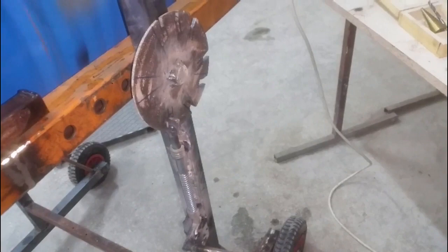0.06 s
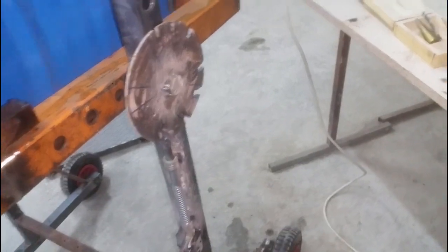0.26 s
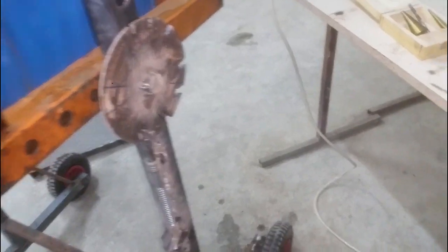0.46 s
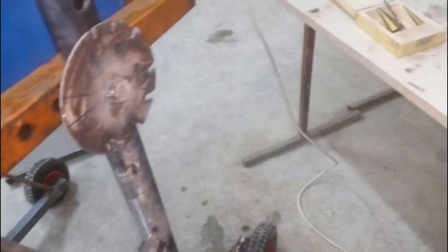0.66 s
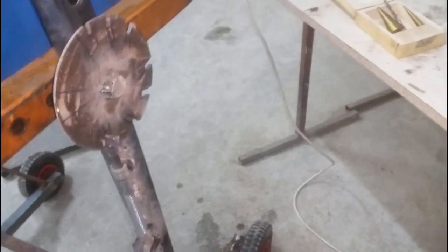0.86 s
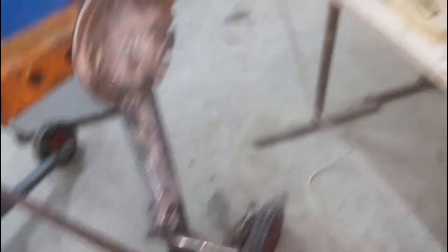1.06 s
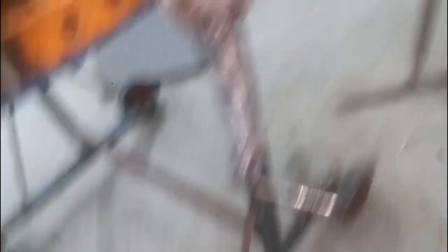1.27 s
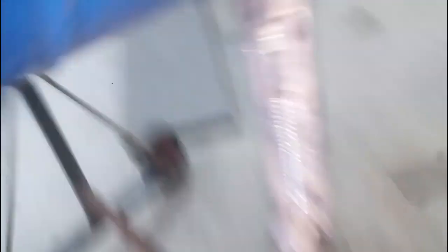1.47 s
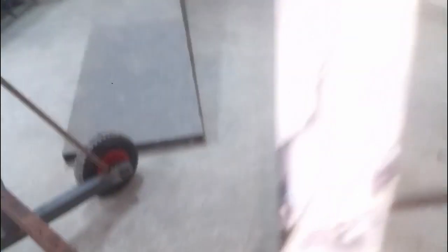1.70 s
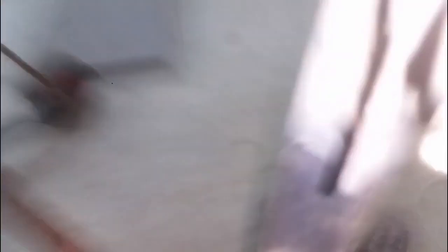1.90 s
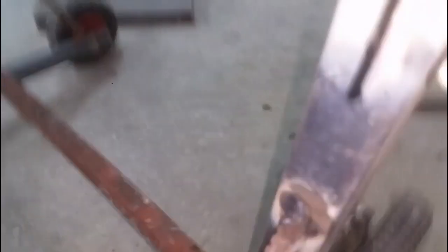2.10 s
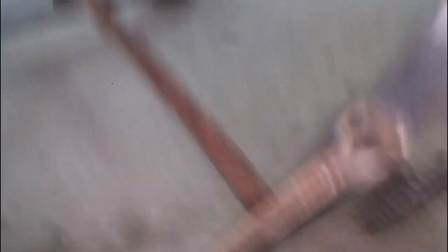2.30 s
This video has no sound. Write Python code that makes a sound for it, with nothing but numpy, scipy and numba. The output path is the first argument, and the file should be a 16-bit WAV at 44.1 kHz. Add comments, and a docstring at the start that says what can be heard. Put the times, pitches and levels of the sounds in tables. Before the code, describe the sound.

A steel trolley rolls over a concrete workshop floor, its frame rumbling and rattling as grit hisses and loose metal clinks. Near the end a sharp knock and brief finger rub hit the close microphone, and the rolling quietens.

```python
"""Trolley on a workshop floor

A steel trolley is pushed over concrete, close to a hand-held phone with two microphone ports.
Its knobbly wheels drum the frame into a rumble, grit hisses under them and loose metal parts clink.
A knock overloads the phone, a finger judders over it and the limiter ducks; the trolley rolls on slowly.
"""
import sys
import numpy as np
from scipy import signal
from scipy.fft import rfft, irfft
from scipy.io import wavfile
from scipy.ndimage import uniform_filter1d, minimum_filter1d
from numba import njit

SR = 44100
rng = np.random.default_rng(int(sys.argv[2]) if len(sys.argv) > 2 else 0)


def wrap_up_sound(samples):
    """Save the sound to the file named by the first command line argument, as 16-bit audio."""
    columns = np.atleast_2d(samples).T
    # keep every value between -1 and 1, then stretch to whole-number steps
    tamed = np.clip(columns, -1, 1)
    steps = np.round(tamed * 32767).astype(np.int16)
    wavfile.write(sys.argv[1], SR, steps)


N = 108045
T, F = np.arange(N) / SR, np.maximum(np.fft.rfftfreq(2 * N, 1 / SR), 1)
START_S, PORT_LAG_S = .132, .00042


# The trolley passing close by. Each row: time in seconds, level in dB, bass and rattle offsets in dB.
ROLLING = [(.135, -53.5, 3, -5), (.16, -34, -5.5, -11), (.2, -31, -2.5, -10), (.33, -26.5, -0.5, -11),
           (.455, -25, -1.5, -7), (.49, -21.5, -2, -8.5), (.57, -21, 0.5, -8), (.68, -22.5, 3, -6.5),
           (.84, -17.5, -4.5, -10.5), (.92, -18, 0.5, -6.5), (1.06, -17.5, 0, -10), (1.19, -17.5, 3, -9.5),
           (1.28, -17, -1, -9), (1.4, -19, 2, -7.5), (1.62, -21.5, 0.5, -9), (1.9, -24, -3.5, -10),
           (2.02, -23, 6.5, -11), (2.2, -32, -4.5, -7), (2.45, -34.5, 2.5, -11.5)]

def trolley(jolt_db=1, jolts_per_s=22):
    """The wheels drum the frame and shake its joints in uneven jolts."""
    drive = undb(curve(ROLLING) + jolt_db * walk(jolts_per_s)) * (T > START_S)
    return drive * (rumble(curve(ROLLING, column=2)) + rattle(curve(ROLLING, column=3)))


# Modes of the steel frame. Each row: pitch in Hz, width in Hz, relative level in dB.
FRAME_MODES = [(48, 5, -11), (73, 6, 1), (99, 8, -3), (114, 7, -1), (150, 16, -12), (171, 12, -8),
               (199, 9, -6), (219, 12, 0), (247, 14, -5), (318, 11, -2), (341, 16, -5), (363, 12, -11),
               (434, 8, -7), (460, 14, -11), (496, 10, -14), (525, 8, -4), (600, 8, -10), (640, 18, -11),
               (742, 10, -17), (899, 12, -20), (938, 10, -18), (1136, 10, -22)]
# Frame and floor between the modes. Each row: frequency in Hz, relative level in dB.
BROAD_RESPONSE = [(20, -26), (45, -26), (65, -18), (110, -39), (210, -2), (280, 10.5), (350, 8), (400, 6.5),
                  (560, 6.5), (720, -24), (860, -9), (1100, -49), (1600, -55), (4000, -71)]
# The rumble sits left of the phone. Each row: frequency in Hz, left minus right in dB.
RUMBLE_BALANCE = [(70, 1.4), (150, 1.6), (250, 0.34), (450, 4.9), (750, 6.8), (1200, 8)]

def rumble(bass_db, tyre_hz=1083, bass_edge_hz=222):
    """Tread impacts, softened by the tyres, ring the frame."""
    tread = lambda: ports(bumps(980, spread_db=-1.5))
    modes = modal_response(FRAME_MODES) / (1 + (F / tyre_hz) ** 6)
    ring = unit(through(tread(), modes))
    broad = unit(through(tread(), undb(over_hz(BROAD_RESPONSE))))
    frame = through(ring + undb(-9) * broad, pan(over_hz(RUMBLE_BALANCE)))
    bass = through(frame, 1 / (1 + (F / bass_edge_hz) ** 8))
    return undb(-.5) * unit(frame - bass) + undb(bass_db) * unit(bass)


# Bearings and joints at close range. Each row: frequency in Hz, relative level in dB.
RATTLE_COLOUR = [(300, 3.5), (700, -2.5), (1000, 6), (1300, 6), (1700, 3), (2250, -0.5), (2800, -7),
                 (3500, -12), (4600, -16), (5200, -22), (7500, -26.5), (12000, -30), (15500, -17)]

def rattle(level_db):
    """Bearings and joints chatter through the many close, high modes of the steel tubes."""
    impacts = ports(bumps(7000, spread_db=1.3))
    ring = rng.standard_normal((2, N)) * fade(0, t60=.068)
    tubes = 1 + 1.65 * unit(np.abs(rfft(ring, 2 * N)))
    chatter = unit(through(impacts, undb(over_hz(RATTLE_COLOUR)) * tubes))
    return undb(level_db - 1) * chatter * pan(2)


# Dents in the concrete. Each row: start in seconds, relative level in dB, pitch in Hz.
FLOOR_DENTS = [(0.467, -5.5, 322.6), (0.47, -17, 375), (0.841, -8, 237)]

def dents(rise_s=.042, t60=.14):
    """A wheel drops into a dent and rings a single mode."""
    out = 0
    for start, db, hz in FLOOR_DENTS:
        envelope = fade(start, t60) - fade(start, rise_s)
        out = out + undb(db) * envelope * np.sin(2 * np.pi * hz * (T - start))
    return out * pan(2)


# Drones of the frame, just left of centre. Each row: middle and length in seconds, pitch in Hz,
# glide in Hz per second, level in dB.
FRAME_DRONES = [(0.298, 0.2, 218.6, 0, -31), (0.668, 0.59, 330, -5, -24), (.8, 0.22, 218.3, 47, -19.5),
                (1.02, 0.51, 529, 5, -22.5), (1.06, 0.22, 216.3, -30, -20.5),
                (1.251, 0.37, 73.3, -2, -21.5), (.95, 0.15, 109.7, -5, -19), (1.32, 0.21, 111.9, 28, -15.5),
                (1.325, 0.32, 317.8, -7, -22.5), (1.879, 0.21, 318.7, 5, -22.5), (1.428, 0.17, 600, 9, -22),
                (1.5, 0.099, 639, 0, -22.5), (1.621, 0.11, 223.5, -4, -21.5), (1.8, 0.18, 207.2, -130, -20),
                (2.21, 0.27, 333.8, -130, -30.5), (2.41, 0.15, 205, 0, -29)]

def drones(waver_db=-.5, wavers_per_s=23):
    """The rolling catches single modes of the frame, which swell, waver and die away."""
    out, port_delay = 0, np.array([[0], [PORT_LAG_S]])
    for middle, length, hz, glide, db in FRAME_DRONES:
        t = T - middle
        swell = np.cos(np.pi * np.clip(t / length, -.5, .5))
        level = undb(db + waver_db * walk(wavers_per_s))
        turns = hz * (t - port_delay) + glide * t ** 2 / 2 + rng.random()
        out = out + swell * level * np.sin(2 * np.pi * turns)
    return out * pan(1.5)


# The phone rattling to and fro in the grip. Each row: start in seconds, relative level in dB,
# direction as +1 or -1, T60 in seconds, brightness of the contact in Hz.
GRIP_KNOCKS = [(1.9662, 15, 1, .009, 3200), (1.9674, 22, -1, .011, 3200), (1.9712, 15, 1, .015, 1500),
               (1.9768, 12, -1, .013, 1100), (1.9808, 16, 1, .014, 900), (1.9895, 8, 1, .012, 350),
               (2.0005, 13, 1, .018, 300)]
# Modes of the phone body. Each row: pitch in Hz, width in Hz, relative level in dB.
PHONE_MODES = [(206, 26, -7), (387, 93, 5.5), (695, 180, 7)]

def knocks():
    """Pushes, hard then softer, hit the right port directly and both ports through the ringing body."""
    push = 0
    for start, db, direction, t60, hz in GRIP_KNOCKS:
        contact = 1 / (1 + 1j * F / hz) ** 2
        push = push + through(undb(db - .5) * direction * fade(start, t60), contact)
    body = through(push, modal_response(PHONE_MODES))
    return np.array([-undb(-4) * body, push + undb(-6.5) * body])


def finger_judder(start=2.023, end=2.105, slips_per_s=47, case_hz=141):
    """A finger slips in jerks by the right port, and each slip thumps the case."""
    slips = np.arange(start, end, 1 / slips_per_s)
    lift = np.clip((end + .011 - T) / .02, 0, 1)
    out = 0
    for due, (late, size_db, tightness) in zip(slips, rng.standard_normal((len(slips), 3))):
        onset = due + .00098 * late
        hz = case_hz * (1 + .095 * tightness)
        thump = fade(onset, t60=.054) * np.sin(2 * np.pi * hz * (T - onset))
        out = out + undb(13.5 + size_db) * through(thump, resonance(case_hz, width=196))
    return out * lift * undb([[-48], [0]])


# Loose metal, near and to the left. Each row: start in seconds, level in dB, left minus right in dB.
METAL_CLINKS = [(.3196, -49, 16), (0.8787, -45.5, 17), (.973, -39, 12), (0.9936, -29.5, 8),
                (1.3112, -25, 11), (1.344, -46, 6), (1.3647, -35.5, 11), (2.116, -47, 16), (2.127, -51, 8),
                (2.156, -40.5, 13)]
# Modes of the loose part. Each row: pitch in Hz, width in Hz, relative level in dB.
METAL_MODES = [(4200, 110, 1), (4630, 250, 1), (6000, 520, -6.5), (7020, 120, -1.5), (8070, 80, -4),
               (9160, 230, -1), (9240, 200, -1), (10300, 240, 9.5), (11200, 580, 4.5), (12270, 100, 12),
               (12350, 130, 3.5), (13050, 200, -1), (14000, 560, -12)]

def clinks(t60=.15, room_t60=.46, room_db=-19):
    """A loose steel part chatters briefly, and the workshop carries its ring."""
    shake = 0
    for start, db, side_db in METAL_CLINKS:
        decay = fade(start, t60) + undb(room_db) * fade(start, room_t60)
        shake = shake + undb(db) * pan(side_db) * decay
    return shake * unit(through(bumps(5000, spread_db=2.9), modal_response(METAL_MODES)))


# Grit on the floor, left of the phone. Each row: time in seconds, relative level in dB.
GRIT_LEVEL = [(.135, -61.5), (.2, -50), (.28, -48.5), (.33, -44), (.62, -42), (.8, -39), (.97, -35.5),
              (1.12, -39), (1.27, -39.5), (1.38, -42.5), (1.52, -39), (1.65, -36), (1.92, -44),
              (2.06, -50.5), (2.18, -51), (2.28, -53), (2.45, -60)]
# Its hiss at the microphone. Each row: frequency in Hz, relative level in dB.
GRIT_COLOUR = [(2000, 0), (5500, -22), (7500, -16), (8700, -10), (10200, 2.5), (11400, -1), (12400, -1),
               (13300, -8), (15800, -5.5)]

def grit():
    """Fine dust crunches under the wheel on the left."""
    grains = unit(through(bumps(12000, spread_db=2.5), undb(over_hz(GRIT_COLOUR))))
    level = undb(curve(GRIT_LEVEL) - 4.5 + 1.3 * walk(per_s=42.96))
    return grains * level * pan(14) * (T > START_S)


# The hand, right at the microphone. Each row: start in seconds, level in dB.
GRIP_TICKS = [(1.242, -39), (1.4415, -28)]

def grip_ticks():
    """The grip makes small, bright ticks on the case."""
    noise = unit(through(rng.standard_normal((2, N)), resonance(15000, width=2800) ** 2))
    return noise * sum(undb(db) * fade(start, t60=.03) for start, db in GRIP_TICKS)


# The phone's two microphone ports. Each row: frequency in Hz, likeness from 0 to 1.
PORT_LIKENESS = [(60, .88), (280, .85), (600, .62), (1000, .4), (2000, .25), (5000, .05)]

def ports(paths):
    """Two paths mix so that the bass is alike at both ports; the right one hears it later."""
    likeness = over_hz(PORT_LIKENESS)
    mid = through(paths[0], np.sqrt((1 + likeness) / 2))
    side = through(paths[1], np.sqrt((1 - likeness) / 2))
    return np.array([mid + side, through(mid - side, np.exp(-2j * np.pi * F * PORT_LAG_S))])


def undb(db):
    """Decibels to gain."""
    return 10 ** (np.asarray(db) / 20)


def unit(x):
    """Scale to rms 1."""
    return x / np.sqrt(np.mean(x ** 2))


def curve(rows, column=1):
    """One column of a timed table, for every sample."""
    rows = np.array(rows)
    return np.interp(T, rows[:, 0], rows[:, column])


def over_hz(rows):
    """Points joined on a log-frequency axis."""
    hz, value = np.array(rows).T
    return np.interp(np.log(F), np.log(hz), value)


def through(x, response):
    """Filter by a frequency response."""
    return irfft(rfft(x, 2 * N) * response)[..., :N]


def resonance(hz, width):
    """Response of one mode, gain 1 at its centre."""
    return 1 / (1 + 1j * (F ** 2 - hz ** 2) / (F * width))


def modal_response(modes):
    """Summed response of an object's modes."""
    return sum(undb(db) * resonance(hz, width) for hz, width, db in modes)


def pan(db):
    """Left and right gains for a level difference."""
    return undb(np.array([np.atleast_1d(db), -np.atleast_1d(db)]) / 2)


def fade(start, t60):
    """Sudden start, then a decay of 60 dB in t60 seconds."""
    return (T >= start) * np.exp(-np.log(1000) * np.maximum(T - start, 0) / t60)


def walk(per_s):
    """Smooth random wander with rms 1."""
    hold = max(int(SR / per_s), 2)
    steps = np.repeat(rng.standard_normal(N // hold + 1), hold)
    return unit(uniform_filter1d(steps, hold)[:N])


def bumps(per_s, spread_db):
    """Dense random impacts of uneven size, on two unrelated paths."""
    hits = rng.random((2, N)) < per_s / SR
    signs = rng.choice([-1, 1], (2, N))
    sizes = undb(spread_db * rng.standard_normal((2, N)))
    return unit(hits * signs * sizes)


def scene():
    """Trolley, grit, loose metal and the hand on the phone."""
    floor = trolley() + dents() + grit() + clinks()
    hand = grip_ticks() + finger_judder() + knocks()
    return floor + hand + drones()


@njit
def recover(need, keep):
    """Gain reduction that rises at once and dies away slowly."""
    out, held = np.empty(len(need)), 0.
    for i in range(len(need)):
        held = max(need[i], held * keep)
        out[i] = held
    return out


def limiter(x, ceiling_rms=.43, detector_s=.03, release_s=.036, lookahead_s=.0071):
    """The phone looks ahead and ducks both channels when either gets too loud."""
    span, ahead = int(detector_s * SR), int(lookahead_s * SR)
    power = uniform_filter1d(x ** 2, span, origin=span // 2 - 1).max(axis=0)
    need = np.log(np.maximum(power / ceiling_rms ** 2, 1)) / 2
    reduction = recover(need, np.exp(-1 / (release_s * SR)))
    log_gain = uniform_filter1d(minimum_filter1d(-reduction, 2 * ahead), ahead)
    return x * np.exp(log_gain)


def record(dry, low_cut_hz=49, overload_db=9, top_hz=15800):
    """The microphone sheds deep bass and overloads; peaks slip past the limiter and clip; the top is cut."""
    x = signal.sosfilt(signal.butter(4, low_cut_hz, "high", fs=SR, output="sos"), dry)
    x = undb(overload_db) * np.tanh(x / undb(overload_db))
    x = np.clip(limiter(x), -.95, .95)
    return signal.sosfilt(signal.ellip(10, .2, 70, top_hz, fs=SR, output="sos"), x)


dry = scene()
out = record(dry)
wrap_up_sound(out)
```